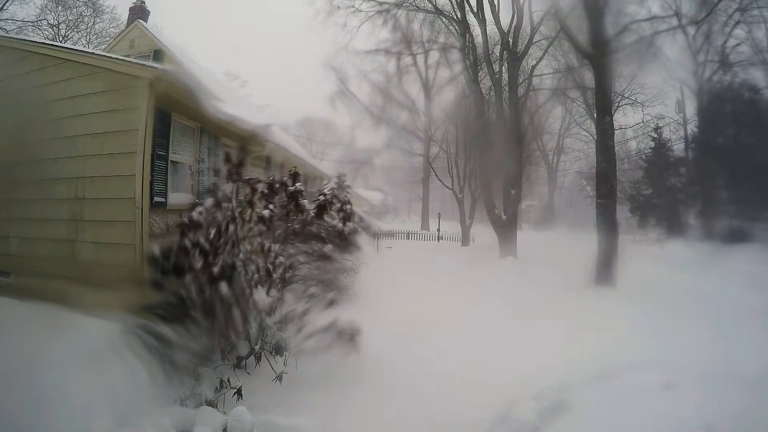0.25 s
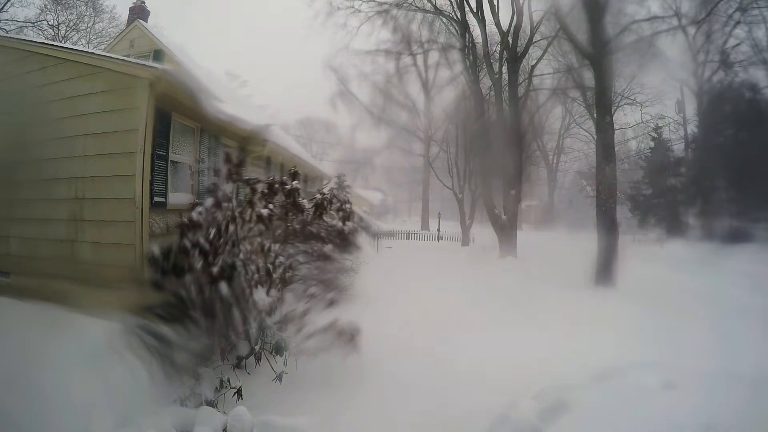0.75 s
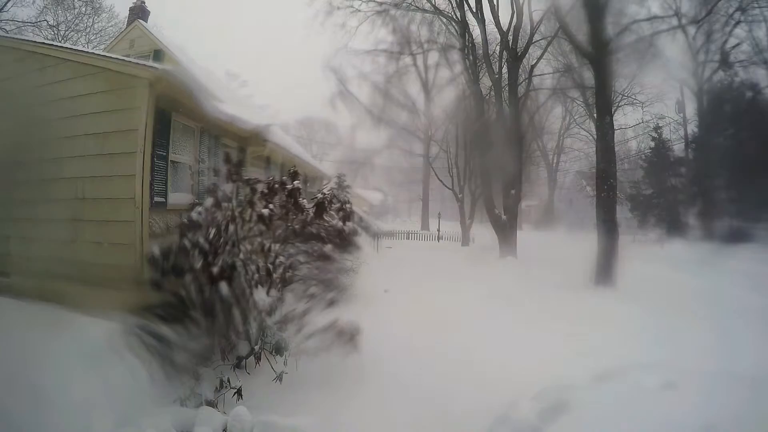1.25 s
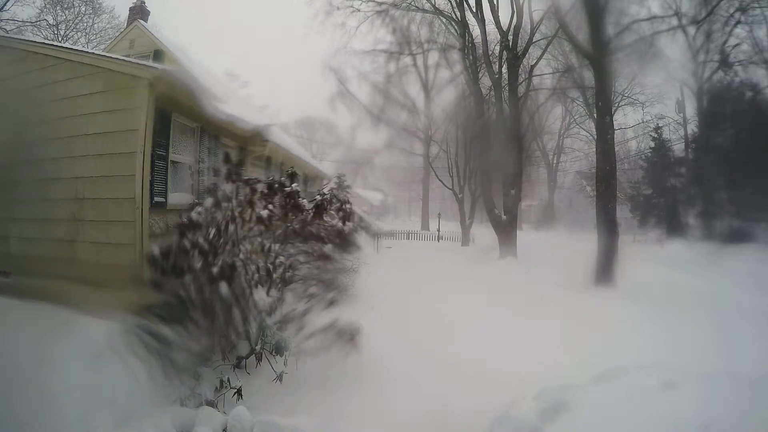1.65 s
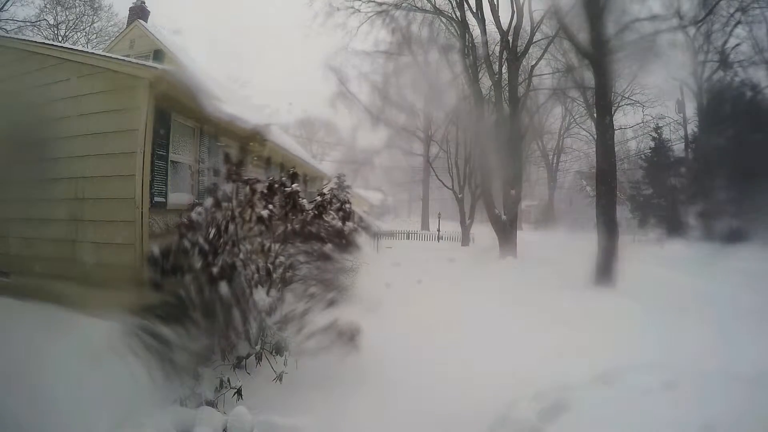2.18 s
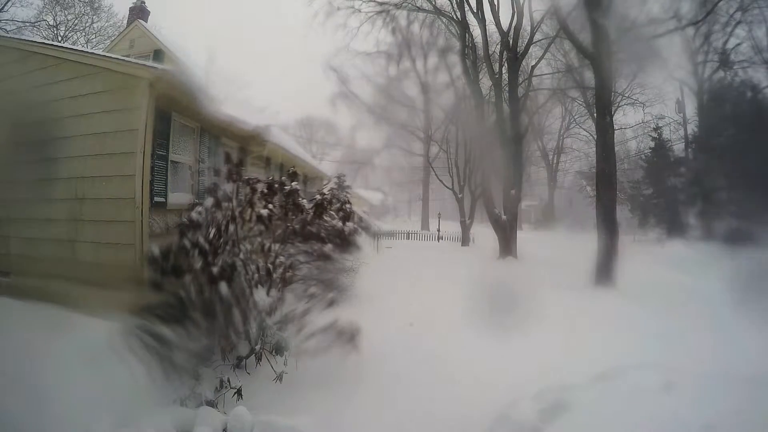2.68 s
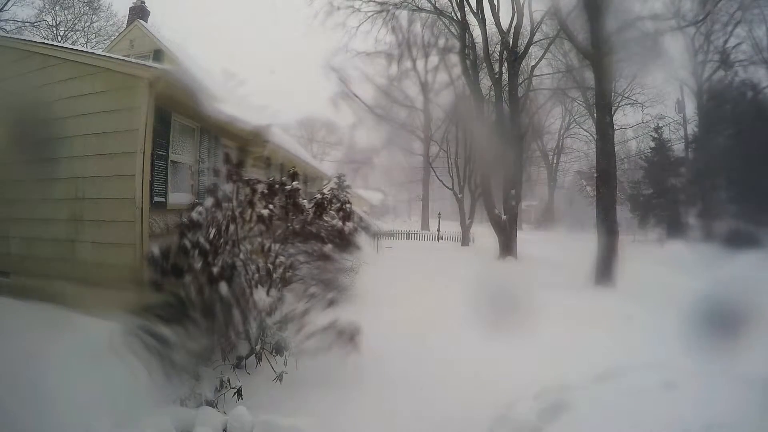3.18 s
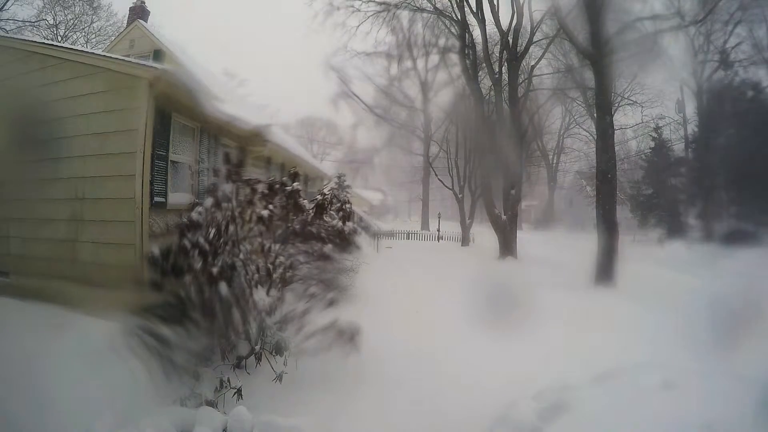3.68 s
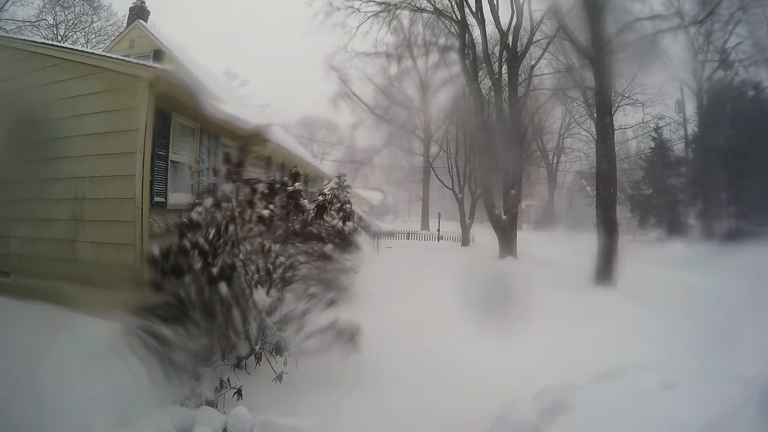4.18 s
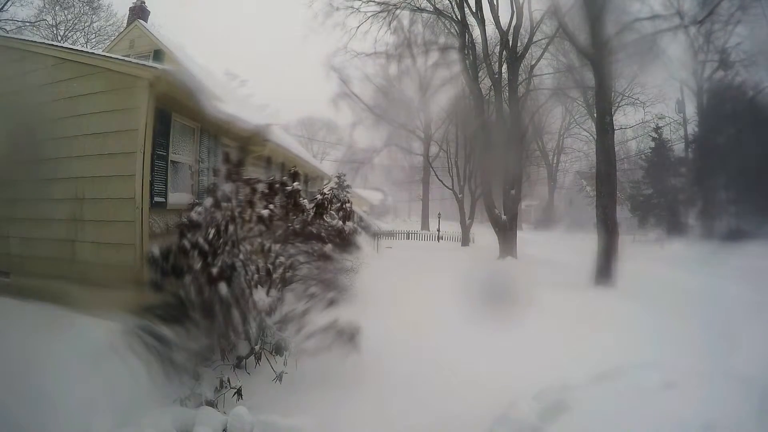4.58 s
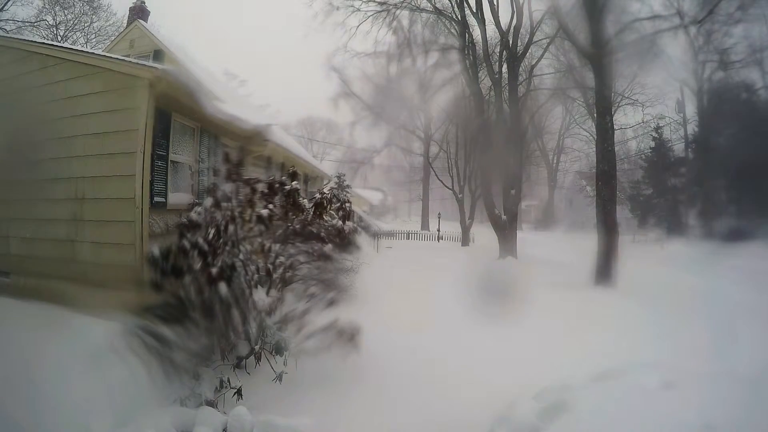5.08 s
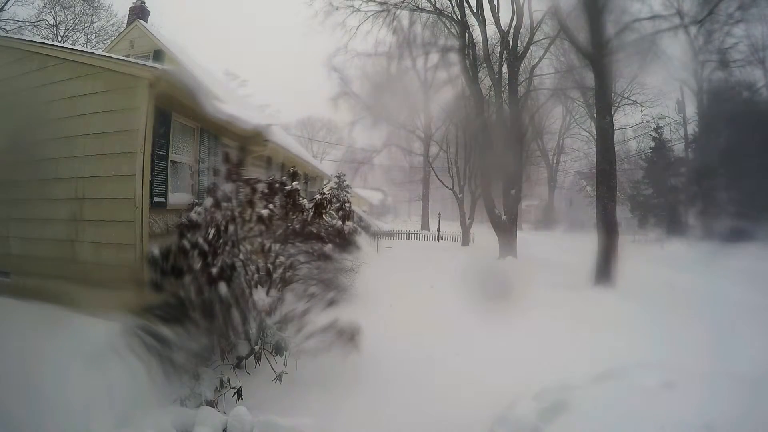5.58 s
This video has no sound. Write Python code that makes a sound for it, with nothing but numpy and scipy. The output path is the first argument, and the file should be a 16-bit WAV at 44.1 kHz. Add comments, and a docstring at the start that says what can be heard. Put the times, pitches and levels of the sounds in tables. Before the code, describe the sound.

Wind-driven ice grains rattle sharply on a thin plastic shell outdoors, swelling and then thinning, above a quiet steady rumble, hiss and faint hum.

```python
"""A blizzard around a camera outside a house. Mains hum, a thin whine and soft whistles last throughout,
under noise shaped as wind: a low rumble on the microphone port and a hiss in bare trees.
Icy pellets, as short decaying rings of the plastic shell, tick singly at first and burst at 2 s.
Thousands of tiny grains crackle in sheets, thickest from about 2.3 to 4.5 s; large pellets cluster
near 2.7 and 4.3 s. Then the snow thins, and a last pellet lands at 5.6 s."""
import sys
import numpy as np
from scipy import signal
from scipy.fft import rfft, irfft, next_fast_len
from scipy.io import wavfile
from scipy.ndimage import map_coordinates

SR = 44100
rng = np.random.default_rng(int(sys.argv[2]) if len(sys.argv) > 2 else 0)


def waveform_to_disk(signal):
    """Save audio, clipped to [-1, 1], as 16-bit WAV at the path in sys.argv[1]."""
    frames = np.transpose(np.atleast_2d(signal))
    scaled = np.clip(frames, -1, 1) * 32767
    samples = np.round(scaled).astype(np.int16)
    wavfile.write(sys.argv[1], SR, samples)


N = 257544

# The shell's low ways of ringing, started by the knock of a blow.
# Each row: pitch in Hz, relative level in dB, time to fall by 60 dB in seconds.
KNOCK_MODES = [(1230, -15.5, 0.0087), (1786, -4.5, 0.015), (2160, -2, 0.016), (2725, 4.5, 0.0082),
               (3124, -5.5, 0.014), (4000, -1.5, 0.013), (4775, 1, 0.0091)]
# The shell's high ways of ringing, started by the sharp crack of a blow.
# Each row: pitch in Hz, relative level in dB, time to fall by 60 dB in seconds.
CRACK_MODES = [(6370, -3.5, 0.0071), (7730, -2, 0.009), (9610, 0.5, 0.0053), (11880, -1, 0.0027),
               (13270, 5, 0.0021)]


def amp(db):
    """Turn decibels into a plain multiplier."""
    return 10 ** (np.asarray(db) / 20)


def unit(x):
    """Scale a sound to an rms (average strength) of 1."""
    return x / np.sqrt(np.mean(x ** 2) + 1e-20)


def curves(rows):
    """Draw straight lines between the rows: one value per sample for each column after the time."""
    s, *columns = np.transpose(rows)
    t = np.arange(N) / SR
    return [np.interp(t, s, column) for column in columns]


def wobble(rate):
    """A smooth random curve through `rate` random points a second."""
    knots = rng.standard_normal(int(N * rate / SR) + 4)
    return map_coordinates(knots, [np.arange(N) * rate / SR])


def filtered(x, response):
    """Multiply each frequency in x by response(Hz)."""
    size = next_fast_len(N + 8192)  # spare room at the end, so that little wraps round
    spectrum = rfft(x, size) * response(np.fft.rfftfreq(size, 1 / SR))
    return irfft(spectrum, size)[..., :N]


def noise(points):
    """Random noise of rms 1, coloured by a spectrum of (Hz, dB) points and silent outside them."""
    f, level = np.transpose(points)

    def colour(hz):
        return amp(np.interp(np.log(hz + 1), np.log(f), level, -120, -120))

    return unit(filtered(rng.standard_normal(N), colour))


def rings(s, db, modes, favour_db, scatter_db, detune, size):
    """Each blow rings every mode at its own strength, pitch and phase; db is the peak of their sum."""
    t = np.arange(size) / SR
    luck = rng.standard_normal((len(s), len(modes), 3))
    shape = np.zeros((len(s), size))  # one row of samples per blow
    for k, (hz, level, t60) in enumerate(modes):
        gain = amp(level + favour_db[:, k] + scatter_db * luck[:, k, 0])
        pitch = hz * (1 + detune * luck[:, k, 1])
        phase = luck[:, k, 2:]
        wave = np.sin(2 * np.pi * pitch[:, None] * t + phase)
        shape += gain[:, None] * amp(-60 * t / t60) * wave
    shape *= 1 - np.exp(-t / 0.00011)  # the contact builds up
    shape *= 1 + 1.37 * np.exp(-t / 0.0012)  # loudest while the ice still presses on the shell
    peak = np.abs(shape).max(1)
    shape *= (amp(db) / peak)[:, None]
    # add every blow at its own place in time
    at = np.round(s * SR).astype(int)[:, None] + np.arange(size)
    return np.bincount(at.ravel(), shape.ravel(), N + SR)[:N]


def tones():
    """Mains hum, a whine that chirps once in every mains cycle at a wavering pitch, and fuzzy whistles."""
    # Steady whistles, as narrow bands of noise.
    # Each row: centre in Hz, width from the centre to 1/e in Hz, rms level in dB.
    whistles = [(689, 61, -69), (1698, 170, -61)]
    mains_hz = 59.88
    mains = 2 * np.pi * mains_hz * np.arange(N) / SR
    hum = amp(-54 + 0.79 * wobble(2.44)) * np.sin(mains)

    whine_hz = 8470 + 55 * wobble(49)
    whine = np.sin(2 * np.pi * np.cumsum(whine_hz) / SR)
    chirp_shape = ((1 + np.cos(mains)) / 2) ** 2.2
    x = hum + amp(-62.0 + 1.5 * wobble(43)) * whine * chirp_shape

    for hz, width, db in whistles:
        band = filtered(rng.standard_normal(N), lambda f: np.exp(-((f - hz) / width) ** 2))
        x = x + amp(db) * unit(band)
    return x


def wind():
    """Lumpy air pressure rumbles on the microphone port; trees and air make a more even rush above."""
    # Level of the wind bed, dipping under the loud snow as if the microphone's gain were turned down;
    # a slight random wobble is added below.
    # Each row: time in seconds, rumble level in dB, hiss level in dB.
    background = [(0, -47.5, -52.5), (.5, -45, -52.5), (1, -49, -51.5), (1.8, -49.5, -52),
                  (2.6, -54, -53.5), (3.6, -48.5, -52), (4.2, -49, -54), (4.7, -47.5, -53.5),
                  (5.84, -51.5, -53)]
    # Colour of the rumble on the port. Each row: frequency in Hz, relative level in dB per Hz.
    rumble_colour = [(6, -17.5), (14, -3.5), (24, -4.5), (72, -13.5), (98, -9), (130, -13.5), (145, -21.5),
                     (300, -46)]
    # Colour of the hiss of trees and air. Each row: frequency in Hz, relative level in dB per Hz.
    hiss_colour = [(130, 0.5), (180, -0.5), (300, -0.5), (600, -7.5), (900, -10), (1300, -5), (1800, -4.5),
                   (2800, -8.5), (3600, -12.5), (8000, -20), (15000, -24), (15500, -50)]
    rumble_db, hiss_db = curves(background)
    rumble = noise(rumble_colour) * amp(rumble_db + 0.49 * wobble(5.1))
    hiss = noise(hiss_colour) * amp(hiss_db + 0.4 * wobble(8.9))
    return rumble + hiss


def thickness():
    """Level of the fine snow in dB: a stream that slowly thickens and thins, plus sheets that come and go."""
    # How thickly fine snow streams past all the time. Each row: time in seconds, level in dB.
    stream = [(0, -61.5), (.6, -55.5), (1, -57), (1.65, -59.5), (2.3, -54), (2.65, -51), (3.6, -48),
              (4.0, -53), (4.5, -46.5), (4.6, -62.5), (5.84, -63.5)]
    # Sheets of snow thrown at the shell. Each row: start of the hold in seconds, hold in seconds, level in dB.
    sheets = [(0.055, .06, -49.5), (0.428, 0.034, -50.5), (1.125, 0.11, -46.5), (1.398, 0.082, -47),
              (1.9, 0.065, -53.5), (2.042, 0.057, -38), (2.208, 0.044, -49), (2.352, 0.048, -47),
              (2.687, 0.042, -41.5), (2.766, 0.13, -41), (3.045, 0.025, -42.5), (3.199, 0.033, -47.5),
              (3.412, .1, -49), (3.78, 0.083, -47), (3.986, 0.068, -50), (4.21, 0.073, -42),
              (4.292, 0.063, -39), (4.406, 0.02, -45.5)]
    rise_s, fall_s = 0.013, 0.031  # time to swell and to die away by a factor e
    t = np.arange(N) / SR
    stream_db, = curves(stream)
    power = amp(stream_db) ** 2
    for s, hold, db in sheets:
        before = np.maximum((s - t) / rise_s, 0)
        after = np.maximum((t - s - hold) / fall_s, 0)
        power = power + (amp(db) * np.exp(-(before + after))) ** 2
    return 10 * np.log10(power)


def flurry(count=6000):
    """Small grains in clumps, a few large and many tiny; each knocks and cracks in its own proportion."""
    knock_db = thickness()
    # the crack lies 5 dB under the knock, and gains 0.05 dB extra for each dB of thicker snow
    crack_db = knock_db - 5 + 0.05 * (knock_db - knock_db.mean())

    # grains land more often where this random curve is high
    chance = np.cumsum(amp(5 * wobble(70)))
    luck = rng.random((count, 3))
    s = np.interp(luck[:, 0], chance / chance[-1], np.arange(N) / SR)
    size_db = -4.5 * np.log(luck[:, 1] + 0.008)
    hard_db = 9 * (luck[:, 2] - 0.5)  # a harder grain cracks more and knocks less

    no_favour = np.zeros((count, len(KNOCK_MODES)))
    knock = rings(s, size_db - hard_db, KNOCK_MODES, no_favour, scatter_db=6.5, detune=0.077, size=400)
    no_favour = np.zeros((count, len(CRACK_MODES)))
    crack = rings(s, size_db + hard_db, CRACK_MODES, no_favour, scatter_db=1, detune=0.094, size=200)
    return amp(knock_db) * unit(knock) + amp(crack_db) * unit(crack)


def pellets():
    """Large pellets knock and crack; where one lands decides which shell mode it favours."""
    # The large pellets, with peaks as they are before the shell's bass cut.
    # Each row: start in seconds, knock peak in dB, crack peak in dB, most favoured pitch in Hz.
    blows = [(0.0712, -27, -39, 2670), (0.1323, -24, -29, 1870), (0.454, -27, -32, 2670),
             (0.5746, -26, -33, 1720), (0.6069, -37, -48, 2150), (0.7017, -21, -34, 2280),
             (1.1247, -33, -33, 4100), (1.1697, -32, -29, 2820), (1.2255, -26, -35, 1980),
             (1.3005, -29, -32, 3400), (1.3943, -29, -35, 2690), (1.4344, -32, -29, 2630),
             (1.9786, -30, -37, 2070), (2.0328, -17, -17, 4720), (2.0431, -40, -23, 2090),
             (2.0641, -20, -17, 2650), (2.0701, -22, -28, 3140), (2.0784, -21, -32, 2220),
             (2.1184, -16, -14, 2090), (2.2272, -34, -29, 2090), (2.3972, -25, -32, 3340),
             (2.4761, -30, -28, 4670), (2.5416, -32, -29, 3360), (2.5934, -31, -30, 4260),
             (2.6344, -23, -27, 4110), (2.6729, -31, -26, 1640), (2.6992, -13, -22, 2130),
             (2.7221, -22, -23, 3420), (2.7338, -17, -28, 2130), (2.7632, -27, -26, 3360),
             (2.7812, -17, -28, 2200), (2.8069, -29, -17, 2130), (2.8168, -24, -25, 3100),
             (2.8415, -25, -30, 2840), (2.8609, -19, -24, 2220), (2.8643, -21, -36, 2950),
             (2.8916, -25, -39, 2130), (2.9197, -20, -31, 2150), (3.1983, -27, -31, 4160),
             (3.3453, -29, -40, 2200), (3.5012, -18, -37, 1900), (3.5068, -23, -35, 2560),
             (3.5231, -30, -28, 1810), (3.5432, -25, -36, 2690), (3.5531, -23, -34, 1740),
             (3.5767, -25, -31, 2760), (3.5838, -25, -34, 1700), (3.6437, -28, -34, 2820),
             (3.7564, -31, -29, 4460), (4.0222, -30, -36, 2540), (4.1633, -23, -18, 2710),
             (4.2126, -23, -34, 3010), (4.2673, -26, -28, 3270), (4.3061, -18, -32, 2110),
             (4.3101, -22, -28, 2070), (4.3169, -21, -35, 3040), (4.3227, -21, -29, 2820),
             (4.328, -20, -19, 4130), (4.3418, -21, -34, 2130), (4.3648, -26, -23, 3080),
             (4.4207, -31, -27, 3320), (4.4429, -25, -28, 2710), (4.4529, -24, -22, 4780),
             (4.4911, -23, -33, 4240), (4.5185, -36, -27, 4700), (4.5434, -29, -28, 2690),
             (5.6186, -27, -34, 4800)]
    s, knock_db, crack_db, hz = np.transpose(blows)
    octaves = np.log2(hz[:, None] / np.array(KNOCK_MODES)[:, 0])
    favour_db = -14 * np.abs(octaves)  # modes far from the favoured pitch ring less
    knock = rings(s, knock_db, KNOCK_MODES, favour_db, scatter_db=5.5, detune=0.019, size=700)
    no_favour = np.zeros((len(s), len(CRACK_MODES)))
    crack = rings(s, crack_db, CRACK_MODES, no_favour, scatter_db=3.0, detune=0.046, size=300)
    return knock + crack


def shell():
    """All the snow heard through the light, stiff shell, which radiates no bass."""
    bass_cut = signal.butter(3, 950, "high", fs=SR, output="sos")
    return signal.sosfilt(bass_cut, pellets() + flurry())


def scene():
    """Add the tones, the wind and the snow on the shell, as one channel."""
    return (tones() + wind() + shell())[None]


def record(dry):
    """The microphone falls away at the top; nothing passes the band limit."""
    top_hz = 16650
    return filtered(dry, lambda hz: (hz < top_hz) / (1 + (hz / 15600) ** 40))


dry = scene()
out = record(dry)
waveform_to_disk(out)
```